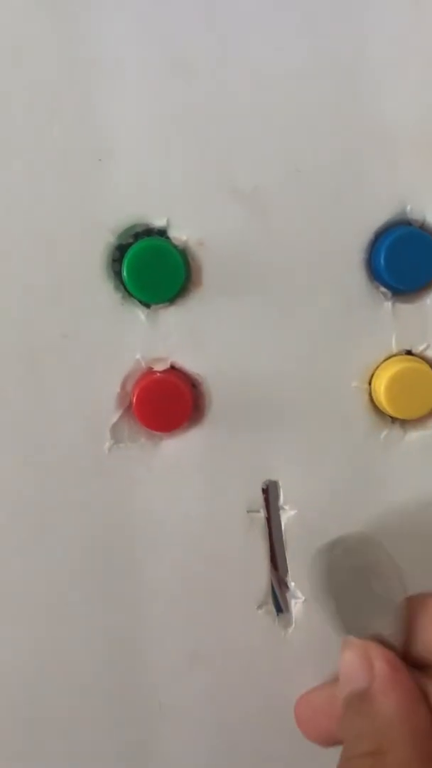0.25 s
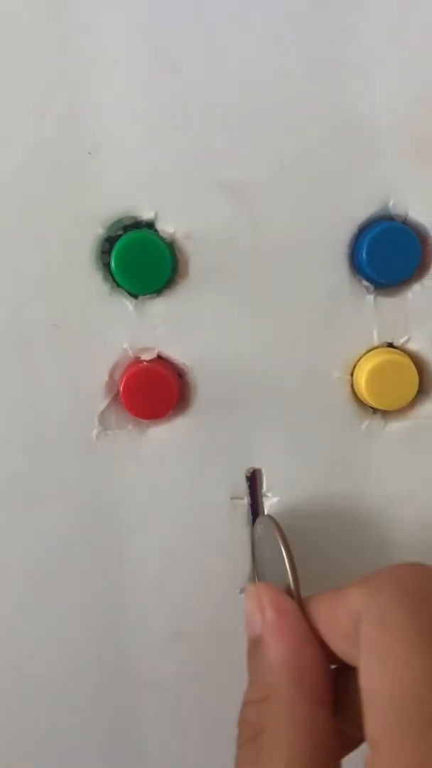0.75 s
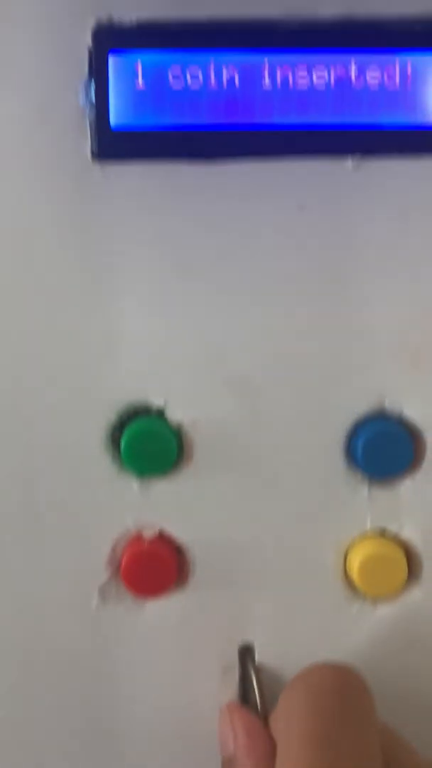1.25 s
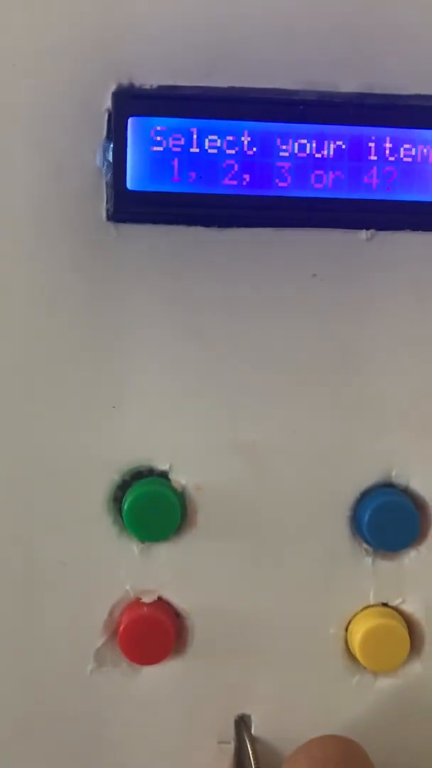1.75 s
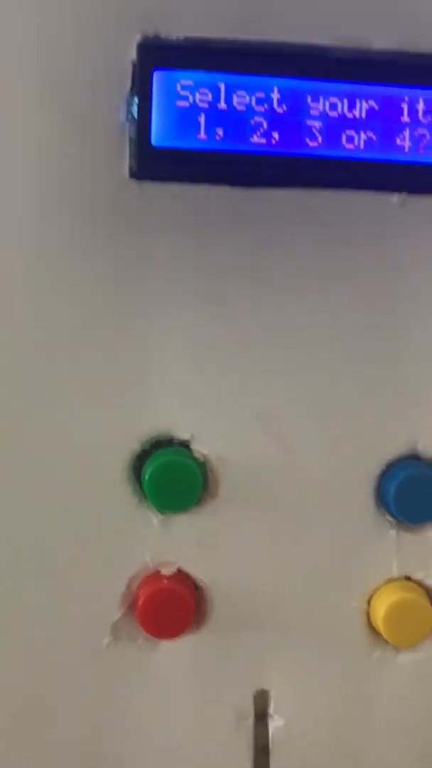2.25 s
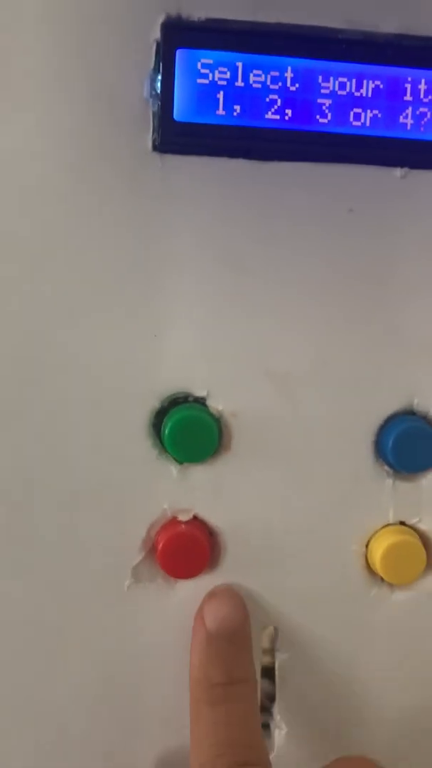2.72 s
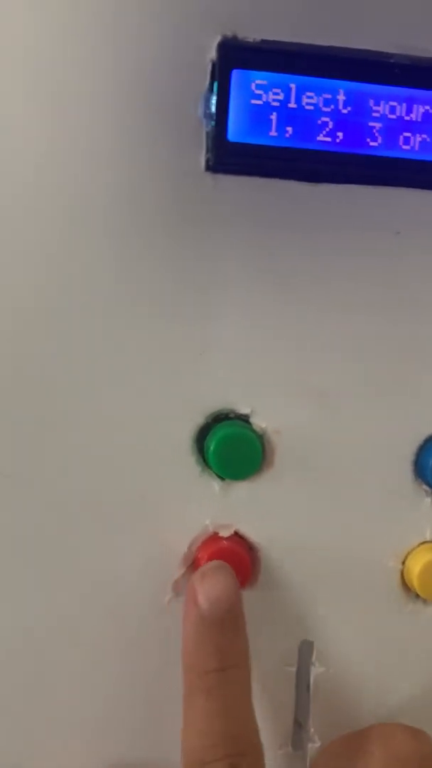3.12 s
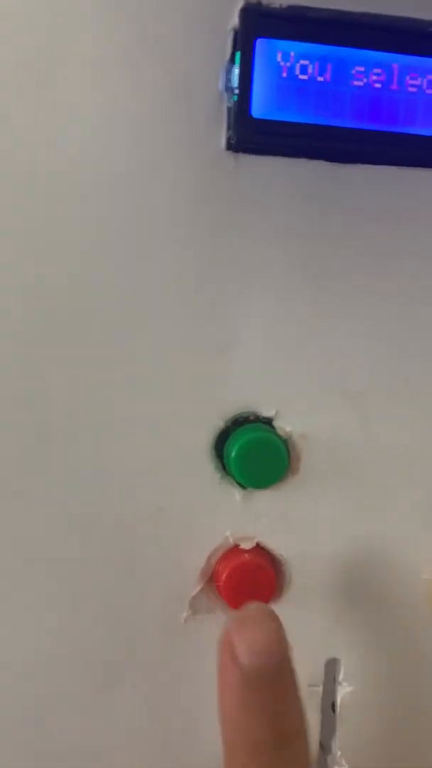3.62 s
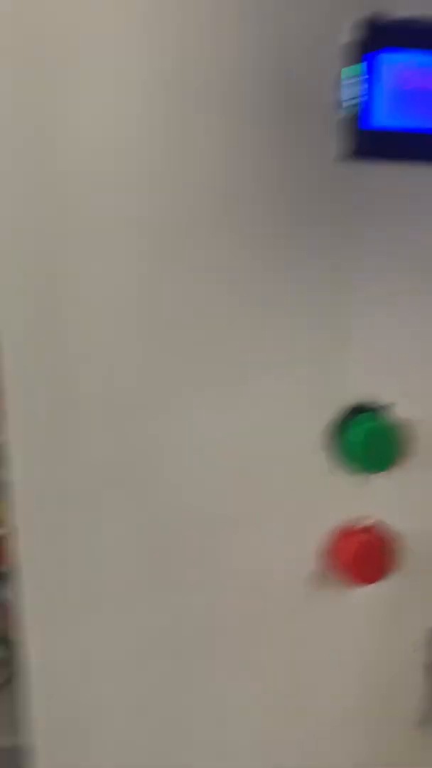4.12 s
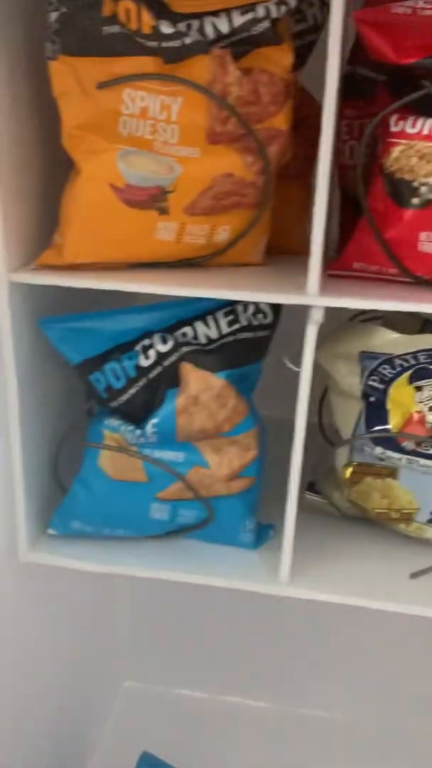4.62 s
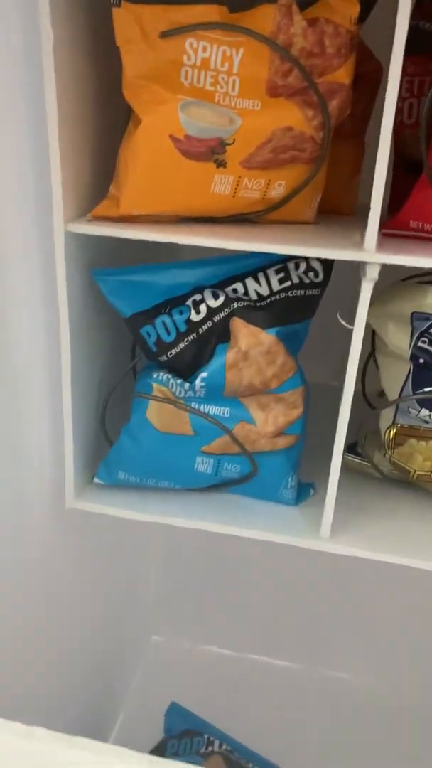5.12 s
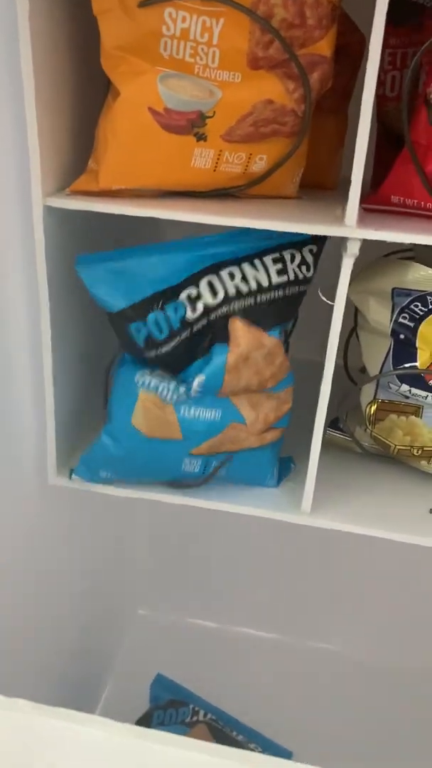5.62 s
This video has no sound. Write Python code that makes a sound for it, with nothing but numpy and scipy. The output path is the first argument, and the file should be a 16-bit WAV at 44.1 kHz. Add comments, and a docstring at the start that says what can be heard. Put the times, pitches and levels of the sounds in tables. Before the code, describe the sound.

Sparse knocks and a brief coin scrape in a quiet room, one hard button press, then a sudden rasping motor with bright bag crinkling.

```python
"""A coin scrapes and knocks at the slot of a homemade snack machine; a button is pressed and let go.
Blows ring the cabinet's modes, sliding is a stream of tiny slips, and the rim squeaks by stick-slip.
Then a small geared servo whines and rasps as it turns a wire coil that judders on its shelf,
while a foil snack bag crinkles in bright cracks and airy pops as it is pushed forward.
Close, in a quiet room with a low rumble; a faint ticking whirr passes before the servo starts."""
import sys
import numpy as np
from scipy import signal
from scipy.fft import rfft, irfft, next_fast_len
from scipy.io import wavfile
from scipy.ndimage import uniform_filter1d

SR = 44100
rng = np.random.default_rng(int(sys.argv[2]) if len(sys.argv) > 2 else 0)


def materialize(psi):
    """Save the field psi as 16-bit PCM at rate SR to the path in sys.argv[1].

    A 1-D psi becomes a single channel; in a 2-D psi each row is a channel.
    """
    bounded = np.clip(np.atleast_2d(psi).T, -1, 1)
    quanta = np.round(bounded * 32767).astype(np.int16)
    wavfile.write(sys.argv[1], SR, quanta)


N = 258602
TIME = np.arange(N) / SR

# servo: switch-on time, then the easing times of its sound and of its speed
SERVO_ON_S, SWITCH_S, SPIN_UP_S = 5.333, .016, .016
START_HZ, LOADED_HZ = 1300, 2205  # gear mesh rate
WHINE_DB, WHINE_RACING_DB = -36.5, 3  # whine under load, and its gain for each 1000 Hz of extra speed
RASP_DB, RASP_GROWTH_DB, WIND_UP_S = -34, 2.5, 0.16  # the rasp grows as the coil takes up the bag
# spectrum of gear teeth rasping: pitch_hz, level_db
RASP_SPECTRUM = [(200, -30), (700, -6), (1200, -2), (1700, -6), (2200, 2.5), (2800, -4), (3400, 1),
                 (4200, -1), (6000, 3.5), (9000, 1), (12000, -1), (15500, -6)]


def servo(jitter=0.013, housing_hz=2810, housing_q=22, housing_db=7.0, throb=0.19, runout=0.75,
          grind_db=-8.5, backlash=0.64, overtone_db=2):
    """Gear teeth whine at the mesh rate and rasp against each other once a pinion turn."""
    mesh_hz = speed()
    extra_khz = (mesh_hz - LOADED_HZ) / 1000
    whine_gain = amp(WHINE_DB + WHINE_RACING_DB * extra_khz)
    rasp_gain = amp(RASP_DB + RASP_GROWTH_DB * running(WIND_UP_S))
    teeth = 2 * np.pi * np.cumsum(mesh_hz * (1 + jitter * wobble(size=40))) / SR
    turn = teeth / 10  # ten teeth a turn
    pinion = np.cos(turn)
    # backlash makes every partial come and go; an off-centre pinion adds sidebands
    whine = 0
    for partial, db in enumerate([0, overtone_db, -5], start=1):
        tone = np.sin(partial * (teeth + runout * pinion))
        whine = whine + (1 + backlash * wobble(size=160)) * amp(db) * tone
    # uneven teeth grind at the lower multiples of the pinion's turn
    grind = amp(grind_db) * sum(wobble(size=500) * np.sin(order * turn) for order in range(3, 9))
    scrapes = grains(per_s=5000, spread_db=1.0) * (1 + throb * pinion)
    rasp = unit(colour(scrapes, RASP_SPECTRUM))
    gears = running(SWITCH_S) * (whine_gain * (whine + grind) + rasp_gain * rasp)
    # the housing sings when the whine sweeps through its resonance
    housing = signal.lfilter(*signal.iirpeak(housing_hz, housing_q, SR), gears)
    return gears + amp(housing_db) * housing


def running(rise_s):
    """Goes smoothly from 0 to 1 once the servo is switched on."""
    return 1 - np.exp(-(np.maximum(TIME - SERVO_ON_S, 0) / rise_s) ** 2)


# the coil slips free and the servo races until the load returns:
# start_s, length_s, top_mesh_hz, skew (no unit; under 1 peaks early)
SURGES = [(5.402, 0.19, 3081, .62), (5.605, .15, 3100, .88), (5.792, .14, 2750, .65)]


def speed():
    """Gear mesh rate in Hz: a spin-up, then one arch for each surge."""
    hz = START_HZ + (LOADED_HZ - START_HZ) * running(SPIN_UP_S)
    for s, length, top_hz, skew in SURGES:
        progress = np.clip((TIME - s) / length, 0, 1)
        hz = hz + (top_hz - LOADED_HZ) * np.sin(np.pi * progress ** skew)
    return hz


# the coil's shaking: steady drive, drive from each bump it carries on, seconds until that crests
RATTLE_DB, RATTLE_JOLT_DB, RATTLE_JOLT_S = -38.5, 0.5, 0.0034
RUMBLE_DB, RUMBLE_JOLT_DB, RUMBLE_JOLT_S = -42.5, -4.5, .016
# spectra of the shelf's rattle and of the low rumble under it: pitch_hz, level_db
RATTLE_SPECTRUM = [(250, -29), (400, -1.5), (490, -3), (590, 7), (720, -17.5), (1000, -4.5), (1300, -10),
                   (2200, -41)]
RUMBLE_SPECTRUM = [(30, -45), (65, -7.5), (100, 1), (150, 0.5), (230, 6), (320, -5), (500, -34)]


def coil(rattle_db=-3, ring_db=-5, take_up_s=0.051):
    """The turning wire judders on its shelf and shakes the cabinet."""
    steady = running(take_up_s)
    rattle = amp(RATTLE_DB) * steady + amp(RATTLE_JOLT_DB) * jolts(RATTLE_JOLT_S)
    rumble = amp(RUMBLE_DB) * steady + amp(RUMBLE_JOLT_DB) * jolts(RUMBLE_JOLT_S)
    judder = grains(per_s=760, spread_db=0.0)
    drive = colour(judder, [(200, -11), (550, 8.5), (1000, -7), (1300, 3.5), (1700, 2), (2400, 0)])
    shelf = amp(rattle_db) * unit(colour(judder, RATTLE_SPECTRUM)) + amp(ring_db) * panel(drive)
    return rattle * shelf + rumble * unit(colour(judder, RUMBLE_SPECTRUM))


def jolts(crest_s):
    """After each bump of the turning coil the shaking swells and settles."""
    total = 0
    for s, db, *_ in KNOCKS:
        if s > SERVO_ON_S:
            age = np.maximum(TIME - s, 0) / crest_s
            total = total + amp(db) * age * np.exp(1 - age)
    return total


# the big folds of the foil bag snapping: start_s, crack_db, pop_db
SNAPS = [(5.415, -27, -34), (5.4625, -35, -25), (5.4903, -18, -26), (5.578, -15, -21.5),
         (5.5941, -21.5, -17.5), (5.604, -20, -25), (5.6176, -19.5, -25), (5.6228, -19, -28),
         (5.6895, -22.5, -19.5), (5.7668, -20, -23.5), (5.8395, -26, -26.5)]
# spectra of the bright crack and of the airy pop: pitch_hz, level_db
CRACK_SPECTRUM = [(1500, -58), (4000, 4), (6500, 14), (9000, 12), (12000, 10), (16000, 3)]
POP_SPECTRUM = [(400, -9.5), (1000, -12), (1700, 3.5), (2500, -14), (3800, 5), (6000, -22), (12000, -66)]


def bag(crack_db=0, pop_db=-1, snap_s=0.0013):
    """Each fold buckles in a quick flurry: a bright crack and a pop of the air inside."""
    out, t = np.zeros(N), np.arange(SR // 20) / SR
    age = t / snap_s
    for s, crack, pop in SNAPS + crinkles():
        foil, air = rng.standard_normal((2, len(t))) * age * np.exp(-age)
        bright = amp(crack + crack_db) * burst(colour(foil, CRACK_SPECTRUM))
        airy = amp(pop + pop_db) * burst(colour(air, POP_SPECTRUM))
        add(out, s, bright + airy)
    return out


# small folds: rate, softest row value, mean rise above it
CRINKLES_PER_S, CRINKLE_DB, CRINKLE_SPREAD_DB = 24, -36.5, 3


def crinkles():
    """Small folds give way at random while the coil turns: rows like those of the big ones."""
    slots = np.arange(SERVO_ON_S + SWITCH_S, N / SR, 1 / CRINKLES_PER_S)
    delay, crack, pop = rng.random((len(slots), 3)).T
    sizes_db = CRINKLE_DB - CRINKLE_SPREAD_DB * np.log(1 - np.array([crack, pop]))
    return list(zip(slots + delay / CRINKLES_PER_S, *sizes_db))


# coin, finger, button and coil striking the cabinet:
# start_s, strength_db, hardness_db (per register), give_db (of the panel), place (0-1 along the panel)
KNOCKS = [(0.052, -45.5, -12.5, -1, 0.12), (0.386, -33.5, -2.5, 5.5, 0.04), (0.4684, -52.5, -2.5, 1, 0.16),
          (0.570, -54, 9, -19, 0.17), (0.9173, -40.5, 0.5, 1.5, .13), (1.0107, -52.5, -0.5, 6, 0.15),
          (1.838, -51, -2.5, 2, .11), (1.936, -45, 6, -8, .1), (2.314, -51.5, -1.5, -4.5, .17),
          (2.6335, -62, 0, 5.5, .1), (2.735, -75, 9.5, 5, 0.5), (3.0869, -61, -4, -3, .084),
          (3.24, -54, -4, -2, .085), (3.2752, -18, -2.5, -8, .11), (3.4283, -31, -11.5, 4.5, .22),
          (3.524, -48, -3, -4.5, 0.08), (4.441, -63, 5, 1, .072), (5.5948, -34.5, 8.5, 0, 0.43),
          (5.6223, -27.5, 6, -25, .11), (5.649, -24.5, 5, -2.5, .15), (5.7609, -33.5, -26, -2, .16),
          (5.8172, -30, -21, 0, .15)]
# the cabinet's modes: pitch_hz, level_db, t60_s
CABINET = [(88.9, -12.5, 0.1), (153, -4, 0.072), (251.2, 2.5, 0.13), (351, -1.5, 0.096), (395.4, -1.5, .07),
           (499, 0, 0.071), (574, -5.5, .08), (754.3, -2.5, 0.041), (966.6, -3, 0.034), (1080, -7.5, 0.059),
           (1320, -1, 0.0067), (1587, -3, 0.034), (1812, -11, 0.015), (2350, -16, 0.0057),
           (2690, -15.5, 0.021), (3830, -22.5, 0.047)]
# spectrum of the hard contact: pitch_hz, level_db
TICK_SPECTRUM = [(1200, -33), (2200, 6), (3700, 0.5), (4400, -6.5), (5300, -2.5), (6800, -3.5), (8200, -18),
                 (9500, -10.5), (12000, -18.5), (16000, -24.5)]


def knocks(tick_s=.0025, clatter_s=0.0083, clatter=0.51, boom_s=0.011, boom=0.56, ring_db=-1,
           clack_db=-5, tick_db=-7, shape_db=6, tilt=0.24):
    """Each blow rings the cabinet; a harder contact tilts the sound from knock to clack to tick."""
    out, t = np.zeros(N), np.arange(SR // 3) / SR
    hz, db, t60 = np.transpose(CABINET)
    order = np.arange(len(hz)) + 1
    decay = amp(db[:, None] - 60 * t / t60[:, None])
    modes = decay * np.sin(2 * np.pi * hz[:, None] * t)
    low, high = hz < 320, hz >= 1200
    chatter_spectrum = [(300, -17.5), (900, -0.5), (1700, 3.5), (2800, -16.5), (6000, -39.5)]
    box_spectrum = [(150, -14.5), (300, -8.5), (800, -7.0), (1300, -15.5), (3000, -42.5)]
    for s, strength_db, hardness_db, give_db, place in KNOCKS:
        # a mode speaks most when struck on one of its bellies; a soft blow misses the higher ones
        belly_db = shape_db * np.cos(2 * np.pi * order * place)
        share_db = belly_db + tilt * hardness_db * np.log2(hz / hz[0])
        # neighbouring modes start in opposite directions
        struck = modes * ((-1) ** order * amp(share_db))[:, None]
        contact, loose, hollow = rng.standard_normal((3, len(t))) * (1 - np.exp(-t / 0.0011))
        tick = burst(colour(contact * np.exp(-t / tick_s), TICK_SPECTRUM))
        # countless weaker modes fill the gaps between the strong ones
        chatter = burst(colour(loose * np.exp(-t / clatter_s), chatter_spectrum))
        box = burst(colour(hollow * np.exp(-t / boom_s), box_spectrum))
        thud = burst(struck[low].sum(0) * (1 - np.exp(-t / .001)))
        knock = burst(struck[~low & ~high].sum(0)) + boom * box
        clack = burst(struck[high].sum(0)) + clatter * chatter
        ring = amp(give_db) * thud + knock + amp(clack_db + hardness_db) * clack
        blow = amp(ring_db) * ring + amp(tick_db + 2 * hardness_db) * tick
        add(out, s, amp(strength_db) * blow)
    return out


def panel(x):
    """What the cabinet's modes, equally weighted, pick out of a continuous drive."""
    total = 0
    for hz, _, t60 in CABINET:
        q = np.pi * hz * t60 / np.log(1000)
        total = total + signal.lfilter(*signal.iirpeak(hz, q, SR), x)
    return unit(total)


# coin or finger sliding on the panel: start_s, end_s, easing_s, friction_db, sharp_hiss_db
STROKES = [(0.049, 0.091, 0.013, -71.5, -73), (0.761, 0.811, 0.019, -54.5, -71),
           (0.886, 0.923, .055, -48.5, -44.5), (0.948, 1.058, 0.072, -61.5, -69.5),
           (1.084, 1.292, 0.032, -66.5, -77), (1.855, 1.947, 0.031, -52.5, -56),
           (1.888, 1.935, 0.0071, -42, -36.5), (1.918, 1.942, 0.006, -40, -51),
           (2.3, 2.322, 0.081, -73.5, -65), (3.155, 3.163, .02, -72, -72),
           (3.506, 3.527, 0.021, -63.5, -63.5), (4.439, 4.469, 0.014, -67.5, -81)]
# spectra of the rubbing and of the sharp edge: pitch_hz, level_db
SCRAPE_SPECTRUM = [(100, 7.5), (250, 1.5), (600, -9), (870, 1), (1200, -5.5), (1550, 4), (1800, -1.5),
                   (2100, -11.5), (2900, -7), (3300, -11), (3900, -12), (6200, -26.5), (9000, -29.5),
                   (16000, -36)]
HISS_SPECTRUM = [(1500, -28.5), (4000, -3.5), (6000, -5.5), (9000, -6), (12000, -9.5), (14500, -3.5),
                 (16000, -2.5)]


def friction(per_s=3000, spread_db=2, ringing=0.088, catch_db=0.8):
    """Tiny slips sound through the panel; a sharp edge adds hiss."""
    slips = unit(colour(grains(per_s, spread_db), SCRAPE_SPECTRUM))
    body = unit(slips + ringing * panel(slips))
    hiss = unit(colour(grains(2 * per_s, spread_db), HISS_SPECTRUM))
    strokes = np.zeros(N)
    for start, end, ease_s, rub_db, edge_db in STROKES:
        strokes += pressure(start, end, ease_s) * (amp(rub_db) * body + amp(edge_db) * hiss)
    return amp(catch_db * wobble(size=200)) * strokes


PRESS_DB = 2.5  # a stroke presses harder by this much from start to end


def pressure(start, end, ease_s):
    """A stroke swells by 20 dB in its easing time, presses a little harder, and eases off alike."""
    outside_s = np.maximum(start - TIME, 0) + np.maximum(TIME - end, 0)
    progress = np.interp(TIME, [start, end], [0, 1])
    return amp(PRESS_DB * (progress - .5) - 20 * outside_s / ease_s)


# the coin's rim squeaking as it leaves the slot: time_s, level_db, pitch_hz
SQUEAK = [(2.251, -73, 2540), (2.279, -79.5, 2750), (2.302, -54.5, 3100), (2.34, -85, 3240)]


def squeak(jitter=0.038):
    """A rough, rising stick-slip tone."""
    s, db, hz = np.transpose(SQUEAK)
    rough_hz = np.interp(TIME, s, hz) * (1 + jitter * wobble(size=25))
    turns = np.cumsum(rough_hz) / SR
    return amp(np.interp(TIME, s, db, left=-150, right=-150)) * np.sin(2 * np.pi * turns)


# the whole front panel swaying after a push: start_s, level_db
SWAYS = [(0.081, -45.5), (0.923, -38.5), (1.939, -33), (2.653, -45), (3.433, -39)]
# the swaying panel's modes: pitch_hz, level_db
SWAY_MODES = [(59.5, 2), (138, -9)]


def sways(t60=0.32):
    """The thin front panel swings slowly back to rest."""
    out, t = np.zeros(N), np.arange(SR // 2) / SR
    swing = sum(amp(db - 60 * t / t60) * np.sin(2 * np.pi * hz * t) for hz, db in SWAY_MODES)
    for s, db in SWAYS:
        add(out, s, amp(db) * swing)
    return out


# a faint ticking whirr that swells and fades: time_s, ticking_db, whirr_db
FAINT_WHIRR = [(4.08, -100, -86), (4.17, -82.5, -72), (4.28, -82.5, -68), (4.40, -81, -69.5),
               (4.47, -100, -79)]


def ticking_whirr(pulse_hz=120):
    """Faint regular ticks, thinned to a bright fizz, over a soft whirr of coloured noise."""
    ticking, whirring = gains(FAINT_WHIRR)
    ticks = np.diff(np.floor(TIME * pulse_hz), prepend=0)
    fizz = unit(colour(ticks, [(5000, -25), (11000, -3), (14000, -12.5)]))
    whirr_spectrum = [(1000, -0.5), (1400, -14.5), (1800, 6.0), (2150, -0.5), (2600, -10.5), (5000, -25.0)]
    whirr = unit(colour(rng.standard_normal(N), whirr_spectrum))
    return ticking * fizz + whirring * whirr


def reflections(x, t60s):
    """Sparse echoes, different at each microphone, each band dying at its own speed."""
    signs = rng.choice([-1., 1.], (2, SR // 2))
    taps = signs * (rng.random((2, SR // 2)) < 3000 / SR)  # about 3000 echoes a second
    taps[:, :SR // 400] = 0  # none in the first 2.5 ms
    hz, t, bands = signal.stft(taps, SR, nperseg=256)
    fading = bands * amp(-60 * t / read(t60s, hz)[:, None])
    tail = signal.istft(fading, SR, nperseg=256)[1]
    return signal.fftconvolve(x[None], tail / np.linalg.norm(tail[0]), axes=1)[:, :N]


APART = .12  # gain of each microphone's own room air beside the shared part
# spectrum of the room's air: pitch_hz, level_db
AIR_SPECTRUM = [(20, -21), (35, 3.5), (55, 4), (120, 2), (200, -3.5), (350, -2.5), (500, -16), (700, -31),
                (1100, -31.5), (2700, -36.5), (3200, -32), (3700, -37.5), (12500, -42), (14000, -62)]


def room_air(level_db=-59):
    """Steady low rumble of the room under a faint hiss."""
    shared, left, right = (unit(colour(rng.standard_normal(N), AIR_SPECTRUM)) for _ in range(3))
    return amp(level_db) * (shared + APART * np.array([left, right]))


def amp(db):
    """Decibels to gain."""
    return 10 ** (np.asarray(db) / 20)


def unit(x):
    """Scales to rms 1."""
    return x / np.sqrt(np.mean(x ** 2) + 1e-20)


def read(points, hz):
    """A spectrum joined by straight lines on a log-frequency axis."""
    f, value = np.transpose(points)
    return np.interp(np.log(hz + 1), np.log(f + 1), value)


def gains(rows):
    """One gain curve for each dB column, silent outside the rows."""
    s, *columns = np.transpose(rows)
    return [amp(np.interp(TIME, s, c, left=-150, right=-150)) for c in columns]


def add(mix, s, sound):
    """Mixes a sound in at s seconds."""
    part = mix[round(s * SR):][:len(sound)]
    part += sound[:len(part)]


def colour(x, points):
    """Causal filter with the given spectrum."""
    log_gain = np.log(amp(read(points, abs(np.fft.fftfreq(4096, 1 / SR)))))
    minimum_phase = np.exp(np.conj(signal.hilbert(log_gain)))
    taps = np.fft.ifft(minimum_phase).real[:2048]
    return signal.fftconvolve(x, taps)[:len(x)]


def burst(x, size=220):
    """Scales a hit so that its loudest few milliseconds have rms 1."""
    return x / np.sqrt(uniform_filter1d(x ** 2, size).max() + 1e-20)


def grains(per_s, spread_db):
    """Random tiny clicks of uneven size; a larger spread makes some stand out more."""
    size = amp(spread_db * np.minimum(rng.exponential(1, N), 4))
    return unit(size * rng.standard_normal(N) * (rng.random(N) < per_s / SR))


def wobble(size):
    """Smooth random wavering; size is the smoothing in samples."""
    return unit(uniform_filter1d(uniform_filter1d(rng.standard_normal(N), size), size))


# decay of the servo's compartment and of the room: pitch_hz, t60_s
COMPARTMENT = [(200, 0.011), (2500, 0.023), (15000, 0.077)]
ROOM = [(100, .25), (500, .3), (2000, .42), (6000, .3), (15000, .12)]


def scene():
    """The front panel and the servo's compartment sound into one small room."""
    inside = servo() + coil() + bag()
    front = knocks() + friction() + squeak() + sways()
    walls = amp(-11) * reflections(inside, COMPARTMENT)
    room = amp(-17.0) * reflections(front + inside, ROOM)
    return front + inside + walls + room + ticking_whirr() + room_air()


# phase between the microphones: pitch_hz, left_lead_radians
PORTS = [(0, 0), (690, -0.5), (1980, 0.2), (2500, 1.4), (3790, 1.6), (6370, 5.9), (6980, 6.5), (9560, 10.3),
         (10600, 12.2), (11500, 12.9), (12600, 15.3), (13700, 16.1), (14800, 18.8), (16400, 19.1)]
# level between the microphones: pitch_hz, left_minus_right_db
LEAN = [(100, -0.6), (400, 0.5), (700, -5), (1100, 0.5), (1900, 0), (2300, -2.5), (3000, 0), (15000, 0)]
EDGE_HZ = 15900  # top of the band


def record(dry):
    """The two microphones differ in phase and level; then the band limit."""
    size = next_fast_len(N + 4096)
    hz = np.fft.rfftfreq(size, 1 / SR)
    # each side takes half of the difference
    port = np.exp(.5j * np.interp(hz, *np.transpose(PORTS))) * amp(read(LEAN, hz) / 2)
    pair = irfft(rfft(dry, size) * np.array([port, 1 / port]), size)[:, :N]
    low_pass = signal.firwin(511, EDGE_HZ, window=("kaiser", 9), fs=SR)
    return signal.oaconvolve(pair, low_pass[None], "same")


dry = scene()
out = record(dry)
materialize(out)
```